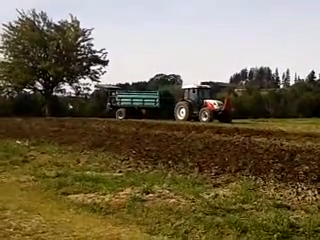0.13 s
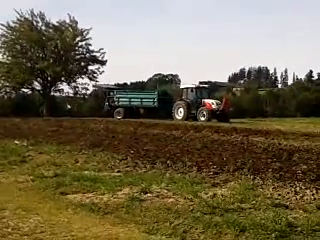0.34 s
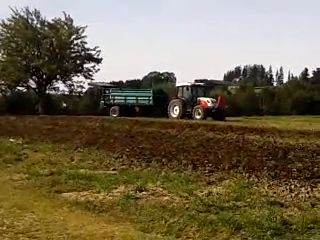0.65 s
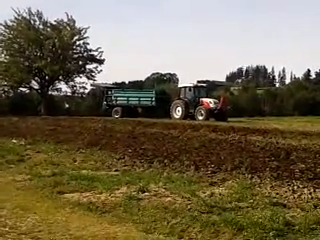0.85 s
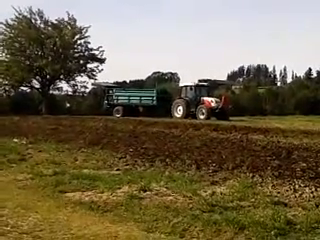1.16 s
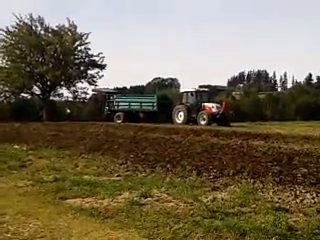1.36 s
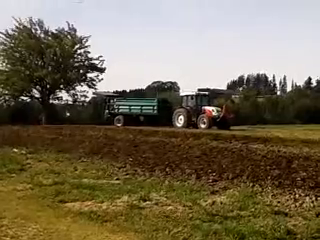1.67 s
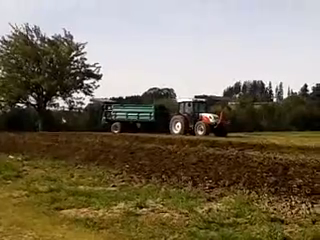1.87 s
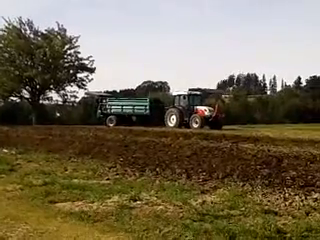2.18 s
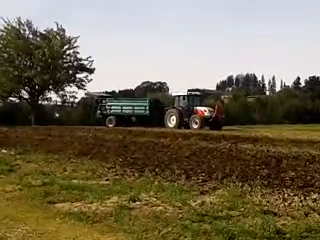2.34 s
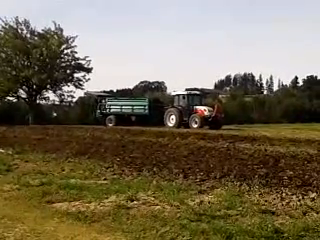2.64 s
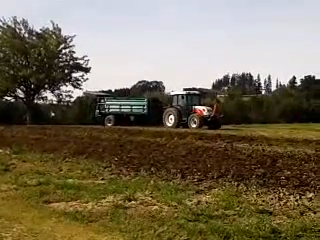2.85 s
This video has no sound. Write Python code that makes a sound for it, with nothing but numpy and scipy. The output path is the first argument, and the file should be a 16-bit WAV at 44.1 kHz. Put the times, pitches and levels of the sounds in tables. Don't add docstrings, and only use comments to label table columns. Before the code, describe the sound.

A tractor engine chugs across an open field, some way off. It labours at about 23 thumps a second with a few steel pings until 0.25 s, then quickens to 26 and clatters lightly until 1.4 s. Load returns; it slows to about 24.5, and bright, irregular pings crowd in from 1.7 s to 3 s. Gear rumble and faint breeze continue beneath; the dull recorder ticks very faintly.

```python
import sys
import numpy as np
from scipy import signal
from scipy.fft import rfft, irfft, next_fast_len
from scipy.io import wavfile
from scipy.ndimage import uniform_filter1d, map_coordinates

SR = 44100
rng = np.random.default_rng(int(sys.argv[2]) if len(sys.argv) > 2 else 0)


def ratio(d):
    e = np.asarray(d, float) / 20
    return 10 ** e


def store_pcm(level_fs):
    pcm = np.round(np.clip(level_fs, -1, 1) * 32767).astype(np.int16)
    wavfile.write(sys.argv[1], SR, np.atleast_2d(pcm).T)


N = 132741
T = np.arange(N) / SR


def unit(x):
    return x / np.sqrt(np.mean(x ** 2) + 1e-20)


def along(points, hz):
    f, v = np.transpose(points)
    return np.interp(np.log(hz + 1), np.log(f + 1), v)


def wobble(rate):
    return map_coordinates(rng.standard_normal(400), [T * rate])


def filtered(x, gain_db):
    m = next_fast_len(N + 8192)
    gain = ratio(gain_db(np.fft.rfftfreq(m, 1 / SR)))
    return irfft(rfft(x, m) * gain, m)[:N]


def patchy(patchy_db, size):
    z = signal.stft(rng.standard_normal(N + size), nperseg=size)[2]
    field = uniform_filter1d(rng.standard_normal(z.shape), size=3, axis=0)
    field = uniform_filter1d(field, size=4, axis=1)
    return signal.istft(z * ratio(patchy_db * unit(field)), nperseg=size)[1][:N]


# multiple of the firing rate, level in dB rms, gain under full load in dB.
EXHAUST_ORDERS = [(1, -48, -.7), (2, -51, 4.5), (3, -60.5, 7), (4, -55.5, -9.5), (5, -71, 5), (6, -68, -1),
                  (7, -80, 10), (8, -81, 10), (9, -65, -6), (10, -67, -9)]


def exhaust(turns, load):
    lead = 1.8 - 1.3 * load
    lag = 1.1 - .83 * load
    spread = .075 + .04 * load
    sway_db, sway_rad = .4, .018
    dull_hz, dull_width_hz, dull_db = 46, 1.6, -6
    firing_hz = np.gradient(turns) * SR
    cylinder_db = 1.2 * load * np.cos(np.pi / 2 * (turns - 1.3))
    total = np.zeros(N)
    for k, db, load_db in EXHAUST_ORDERS:
        level = db + load_db * load + (k > 1) * cylinder_db
        level = level + dull_db * np.exp(-((k * firing_hz - dull_hz) / dull_width_hz) ** 2)
        level = level + sway_db * np.sqrt(k) * wobble(3.9)
        phase = 2 * np.pi * k * turns + lead - lag * k - spread * k ** 3
        phase = phase + sway_rad * k * wobble(15)
        total += np.sqrt(2) * ratio(level) * np.cos(phase)
    return total


# centre in Hz, width in Hz, height in dB.
PANEL_BANDS = [(704, 60, 8.5), (1422, 55, 2.5), (2320, 170, 5.5), (3370, 270, 5.5), (4084, 110, -8),
               (261, 7.2, 6), (620, 4.2, 6.5), (1116, 34, 4), (1636, 36, 4.5), (2957, 280, 5),
               (3600, 28, -4)]


def panels(hz):
    return sum(db / (1 + (2 * (hz - c) / w) ** 2) for c, w, db in PANEL_BANDS)


CYLINDER_DB = [0.16, 2, -0.89, 0.43]
# frequency in Hz, density in dB per Hz.
BLOCK_SPECTRUM = [(470, -45.5), (800, -12.5), (992, -13), (1210, -3.5), (1540, -7), (2020, -3.5),
                  (3110, -5.5), (4200, -1), (5800, -13.5), (7540, -47), (12800, -120)]
# centre in Hz, width in Hz, depth in dB.
LIGHT_LOAD_DIP = (3100, 410, -3.5)


def clatter(turns, level_db, bright_db, load):
    shifted = turns + .13 + .014 * wobble(26)
    index = np.floor(shifted).astype(int) + 2
    u = shifted % 1
    scatter = (.24 + .6 * load) * rng.standard_normal((100, 2))[index].T
    size_db, top_size_db = np.take(CYLINDER_DB, index % 4) * load + scatter
    rise_turn = .22 * (1 + .5 * np.clip(1 - load, 0, 1))
    rise = np.sin(np.pi / 2 * np.clip(u / rise_turn, 0, 1)) ** 2
    knocks = patchy(1.3, size=256)

    def colour(hz):
        return along(BLOCK_SPECTRUM, np.minimum(hz, 5600)) + panels(hz)

    def band(low_hz, high_hz, gain_db):
        shaped = filtered(knocks, lambda hz: colour(hz) - 60 * ((hz <= low_hz) | (hz > high_hz)))
        return shaped * rise * ratio(gain_db)

    bursts = band(-1, 2600, size_db - 9.5 * u - 41 * u ** 3)
    bursts += band(2600, 3900, size_db - 3 + 3.1 * load - (9 + 7.5 * load) * u - 13 * u ** 3)
    bursts += band(3900, 5000, top_size_db + bright_db - 6.9 * u - 17 * u ** 3)
    bursts += band(5000, np.inf, -5 + 5.5 * load - (7.5 + 5.5 * load) * u - 9.4 * u ** 3)
    hiss = unit(filtered(patchy(1.0, size=512), colour))
    block = ratio(level_db + 6.5) * unit(unit(bursts) + ratio(-1) * hiss)
    c, w, dip_db = LIGHT_LOAD_DIP
    hollow = filtered(block, lambda hz: dip_db / (1 + (2 * (hz - c) / w) ** 4))
    return load * block + (1 - load) * hollow


# time of the peak in seconds, peak level in dB, pitch in Hz.
CONTACTS = [(.0117, -31, 3070), (0.0158, -31.5, 2940), (0.055, -36, 3500), (0.064, -37, 3320),
            (0.067, -32, 4380), (.1892, -35.5, 3270), (0.2262, -31, 3210), (1.6916, -46, 2870),
            (1.7262, -34, 2930), (1.734, -35, 3430), (1.7641, -32.5, 3250), (1.887, -30, 2910),
            (2.0497, -32.5, 3050), (2.0542, -28, 3610), (2.0907, -34, 3040), (2.0939, -32, 3400),
            (2.1013, -39, 3540), (2.1787, -41, 3470), (2.2127, -33, 3160), (2.2198, -34.5, 3640),
            (2.2536, -34, 3170), (2.265, -33, 3600), (2.274, -42, 3660), (2.2951, -36, 3380),
            (2.3068, -41, 3420), (2.3786, -30, 3000), (2.387, -31, 3540), (2.4175, -30, 3100),
            (2.4225, -27, 3600), (2.4581, -34.5, 3220), (2.4617, -39, 2940), (2.5034, -38, 3190),
            (2.5407, -25, 3180), (2.5459, -32, 2870), (2.5808, -26.5, 3150), (2.5858, -33, 3000),
            (2.595, -35, 3600), (2.631, -40.5, 3480), (2.7046, -26, 2950), (2.7425, -32, 3170),
            (2.75, -37, 3680), (2.7832, -34, 3160), (2.8295, -41, 3600), (2.866, -27.5, 2950),
            (2.9066, -33, 2930), (2.991, -36, 3600)]
# frequency in Hz, density in dB per Hz.
RATTLE_SPECTRUM = [(2400, -20.5), (2900, -2.5), (3250, -3), (3550, 0.5), (3900, 1), (4800, -31.5)]


def pings():
    rise_s, rattle_t60_s = .0015, .11
    tone, rattle, t = np.zeros(N + SR), np.zeros(N + SR), T[:SR // 10]
    for s, db, hz in CONTACTS:
        start = round((s - rise_s) * SR)
        at = slice(start, start + len(t))
        shape = t / rise_s * np.exp(1 - t / rise_s)
        tone[at] += ratio(db - 1.5) * shape * np.sin(2 * np.pi * hz * t)
        tail_db = .31 * (db + 33.5) - 50
        rattle[at] += ratio(tail_db - 60 * t / rattle_t60_s) * (1 - np.exp(-t / .0033))
    noise = filtered(rng.standard_normal(N), lambda hz: along(RATTLE_SPECTRUM, hz))
    return tone[:N] + rattle[:N] * unit(noise)


# frequency in Hz, density in dB per Hz.
GEAR_SPECTRUM = [(20, -14), (40, 8.5), (70, -5.5), (130, -12), (243, -19), (416, -26), (699, -24.5),
                 (1000, -28), (1400, -46)]
# frequency in Hz, level in dB rms, width in Hz, gain under full load in dB.
RINGING_PARTS = [(264.7, -73, 7, -1), (631, -71, 31, 5), (713.6, -71, 15, 0.5), (1207, -73.5, 55, 0),
                 (1431, -61.5, 45, -4), (2025, -68, 16, -11), (2220, -74, 110, -5), (2870, -70, 87, 4),
                 (3480, -59.5, 39, 1), (3640, -66.5, 72, 14), (4077, -62, 59, 0.5)]


def gears(turns, load):
    def colour(hz):
        low_cut = 10 * np.log10(1 + (115 / (hz + 1)) ** 3)
        return along(GEAR_SPECTRUM, hz) + panels(hz) - low_cut

    swell = np.cos(2 * np.pi * (turns - .3))
    rumble = unit(filtered(patchy(1.0, size=512), colour))
    rumble = rumble * ratio(-53.5 + 3.35 * load + .96 * swell + .3 * wobble(2.7))
    rings = np.zeros(N)
    for c, db, w, load_db in RINGING_PARTS:
        noise = rng.standard_normal(N)
        ring = unit(filtered(noise, lambda hz: -20 * np.log10(1 + (2 * (hz - c) / w) ** 2)))
        rings += ratio(db + load_db * load + 1.5 * wobble(7.5)) * ring
    return rumble + rings * ratio(4.9 * swell)


def breeze():
    noise = filtered(rng.standard_normal(N), lambda hz: -10 * np.log10(1 + (hz / 22) ** 4))
    return ratio(-64) * unit(noise)


# time in seconds, firings a second.
FIRING_RATE = [(0, 23.2), (.15, 23.0), (.3, 26.1), (.5, 26.219), (.9, 26.187), (1.35, 26.264), (1.6, 25.6),
               (1.85, 24.612), (2.1, 24.494), (2.5, 24.481), (3.01, 24.872)]
# time in seconds, clatter level in dB, brightness in dB.
CLATTER_COURSE = [(0, -49.5, 6), (.12, -47.5, 0.5), (.3, -48, -2.5), (.6, -49, -0.5), (1.0, -49, -3),
                  (1.4, -49, 1), (1.8, -49, -1), (2.1, -49, -3.5), (2.4, -49, -0.5), (2.7, -48, -1.5),
                  (3.01, -49, -3)]


def scene():
    turns = -.367 + np.cumsum(np.interp(T, *np.transpose(FIRING_RATE))) / SR
    times, level, bright = np.transpose(CLATTER_COURSE)
    level_db = np.interp(T, times, level)
    bright_db = np.interp(T, times, bright)
    load = np.interp(T, [0, .3, 1.3, 1.9], [1.0, .05, .19, .93])
    engine = exhaust(turns, load) + clatter(turns, level_db, bright_db, load)
    return (engine + pings() + gears(turns, load) + breeze())[None]


def starved(x, holes, size, count, hold):
    hz, _, z = signal.stft(x, SR, window="cosine", nperseg=size)
    draw = rng.random((len(hz) // count + 1, z.shape[1] // hold + 1))
    draw = np.kron(draw, np.ones((count, hold)))[:len(hz), :z.shape[1]]
    kept = z * (draw > along(holes, hz)[:, None])
    return signal.istft(kept, SR, window="cosine", nperseg=size)[1][:N]


# start in seconds, end in seconds.
TICK_PAUSES = [
    (.4, .66),
    (.9, 1.3),
    (1.94, 2.0),
    (2.07, 2.12),
    (2.26, 2.31),
    (2.39, 2.44),
]
STRONG_TICKS = [0, 5, 10, 11, 13, 29, 45]


def ticks():
    period_s, first_s, length_s, tone_hz = .064, .0428, .0115, 7984
    u = (T - first_s) % period_s / length_s
    on = 1 - sum((T > a) & (T < b) for a, b in TICK_PAUSES)
    size_db = -73.5 + .9 * rng.standard_normal(60) + 6.5 * np.isin(np.arange(60), STRONG_TICKS)
    size = ratio(size_db[((T - first_s) // period_s).astype(int)])
    burst = (u < 1) * np.sin(np.pi * u)
    return on * burst * size * np.sin(2 * np.pi * tone_hz * T + 2.3 * wobble(100))


def top_cut(x):
    return signal.sosfilt(signal.butter(12, 9050, fs=SR, output="sos"), x)


# frequency in Hz, gain in dB.
RECORDER_RESPONSE = [(5750, -0.5), (6150, -16.5), (6600, -5.5), (7150, -6), (7400, -27.5), (7560, -66),
                     (8400, -58), (8800, -35), (9050, -42)]
# frequency in Hz, chance of dropping out from 0 to 1.
SHORT_HOLES = [(4600, 0), (5200, .18), (5900, .25), (6150, .85), (6400, .85), (6650, .25), (7600, .25),
               (8000, 0), (8400, .35)]
LONG_HOLES = [(4500, 0), (5000, .3), (5700, .4), (6050, .9), (6350, .5), (7200, .45), (8000, 0)]
# start in seconds, end in seconds.
LONG_SPANS = [
    (.38, .64),
    (.885, 1.29),
]


def record(dry):
    x = filtered(dry[0], lambda hz: along(RECORDER_RESPONSE, hz) - 60 * (hz > 9050))
    spans = sum((T > a) & (T < b) for a, b in LONG_SPANS) * 1.
    long = uniform_filter1d(spans, size=400)
    coarse = starved(x, LONG_HOLES, size=5644, count=4, hold=2)
    fine = starved(x, SHORT_HOLES, size=706, count=5, hold=2)
    mix = long * coarse + (1 - long) * fine + ticks()
    return top_cut(mix[None])


dry = scene()
out = record(dry)
store_pcm(out)
```